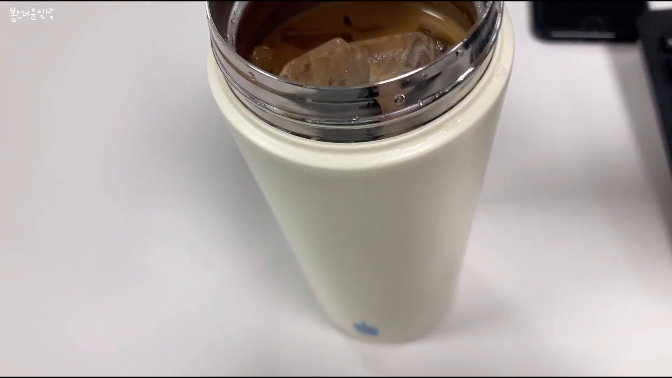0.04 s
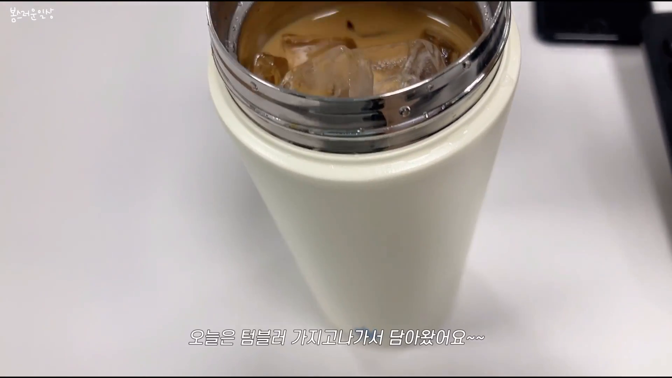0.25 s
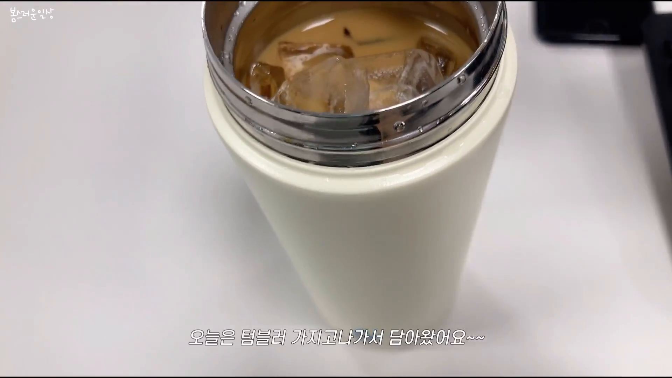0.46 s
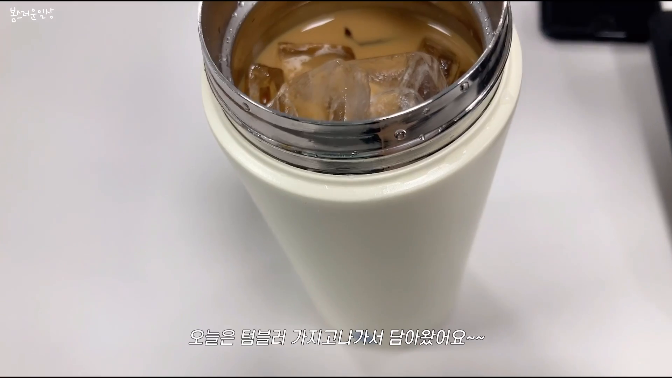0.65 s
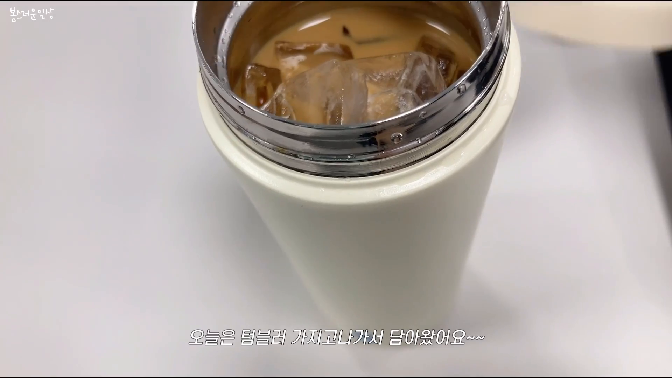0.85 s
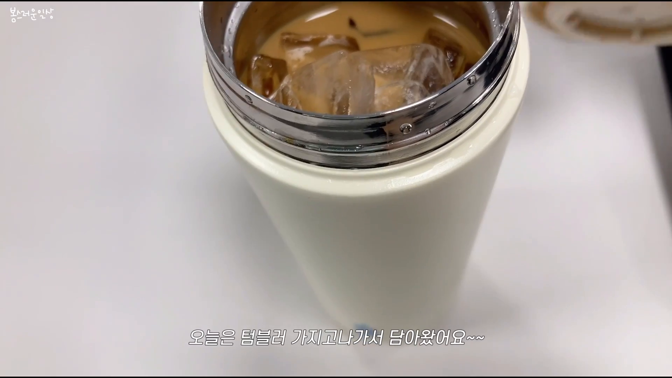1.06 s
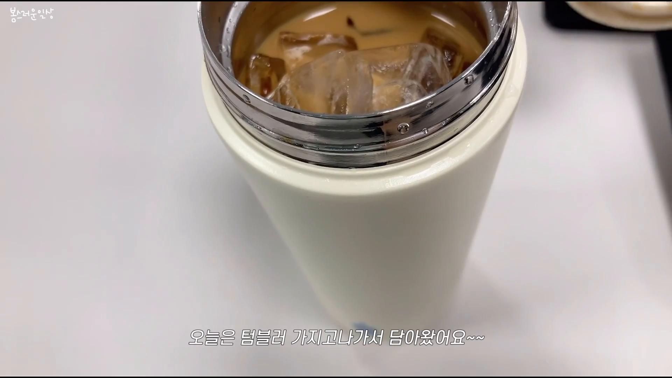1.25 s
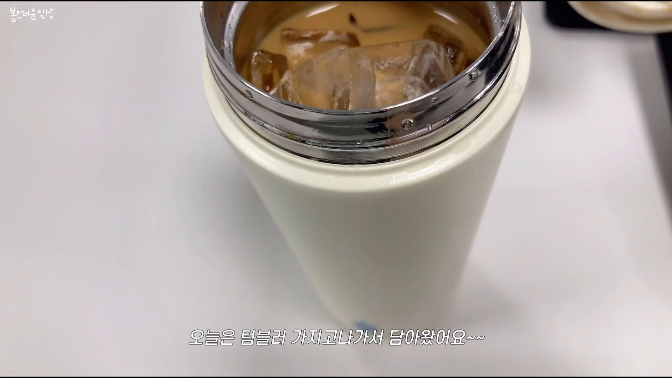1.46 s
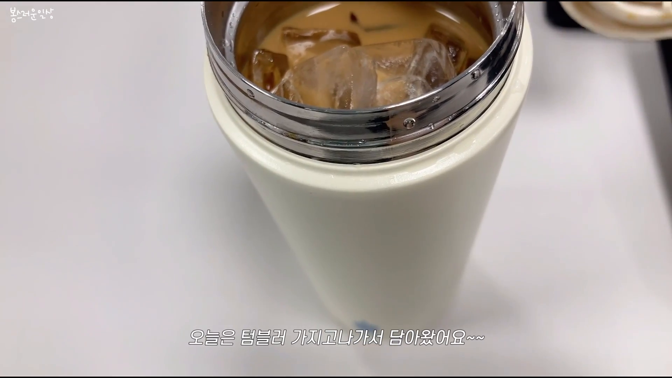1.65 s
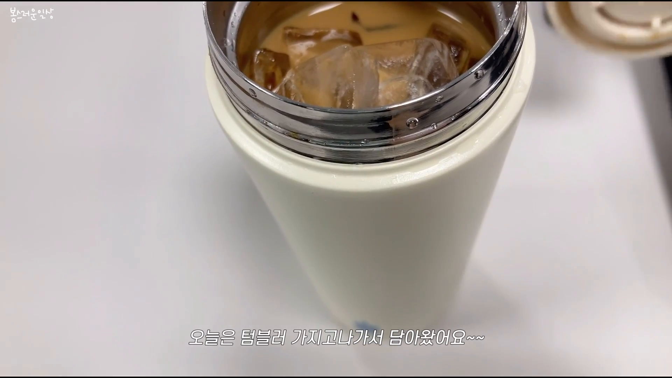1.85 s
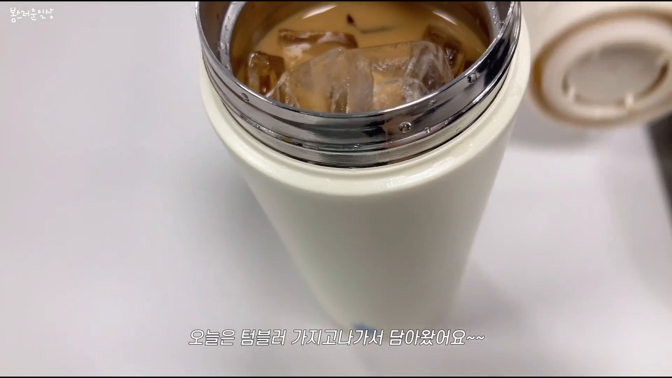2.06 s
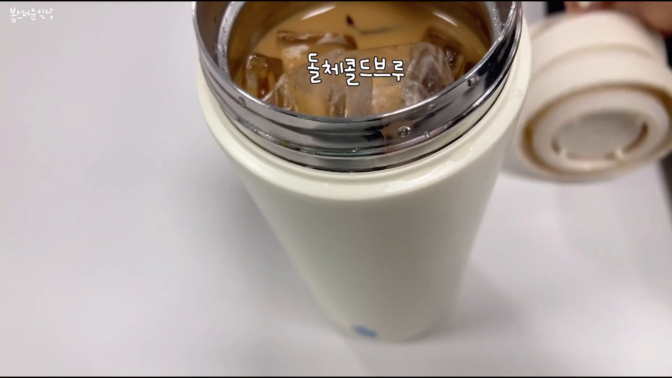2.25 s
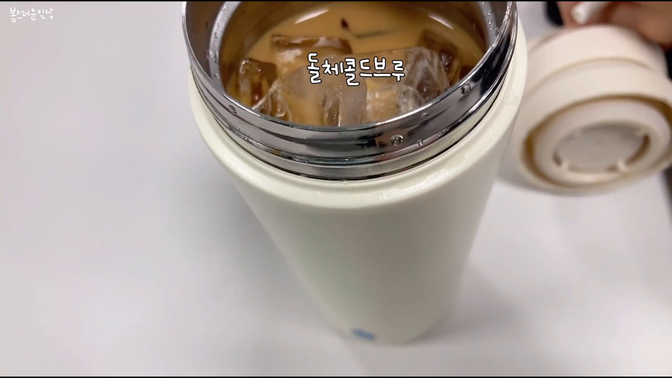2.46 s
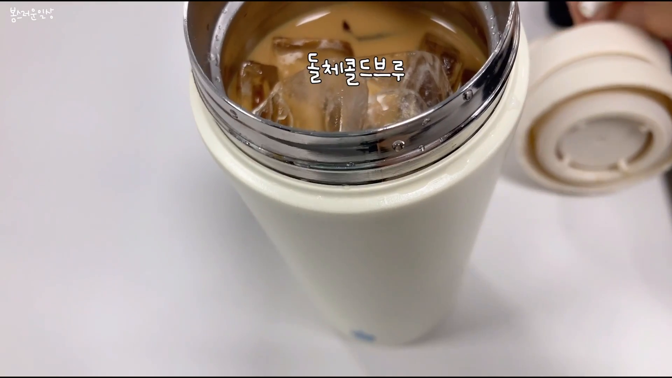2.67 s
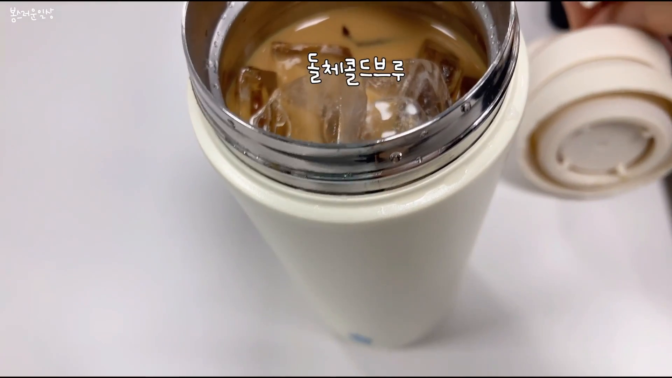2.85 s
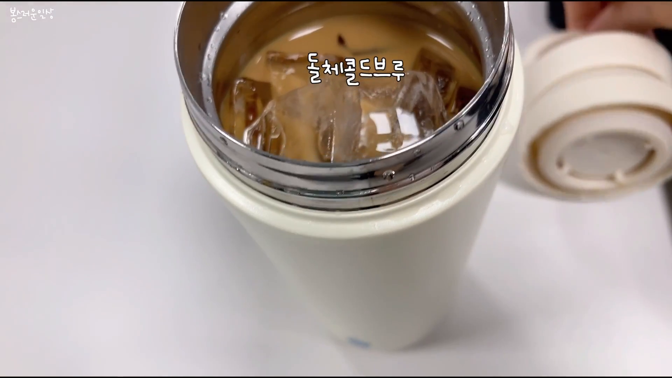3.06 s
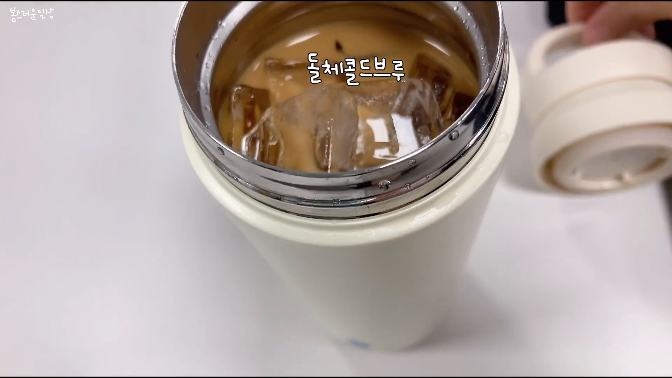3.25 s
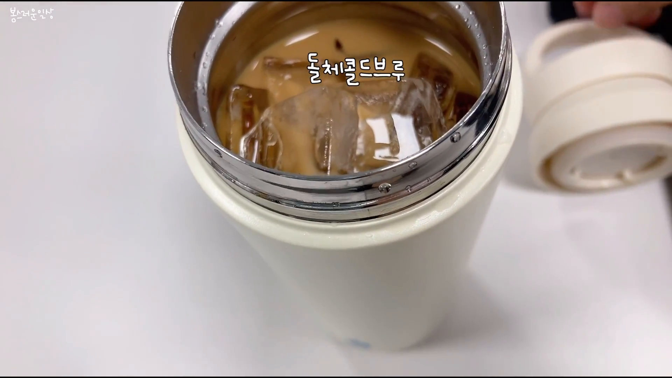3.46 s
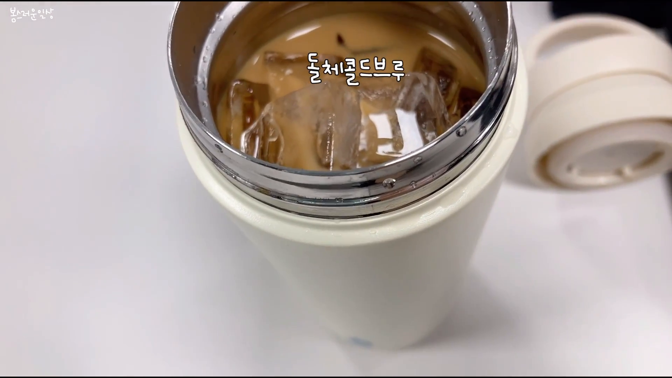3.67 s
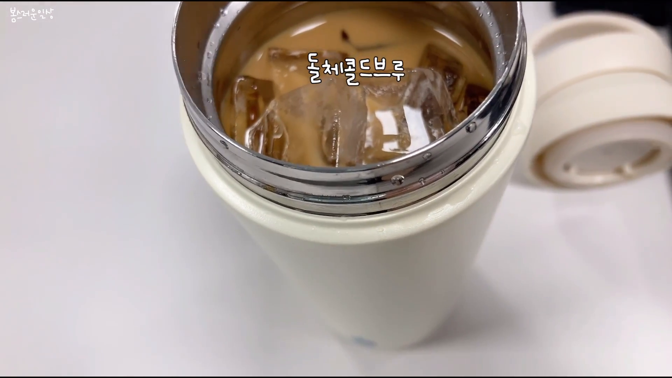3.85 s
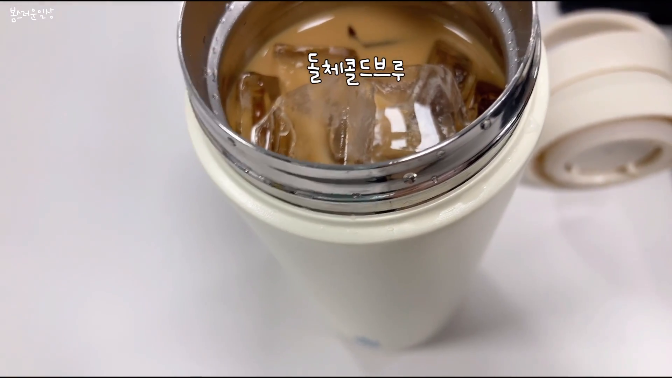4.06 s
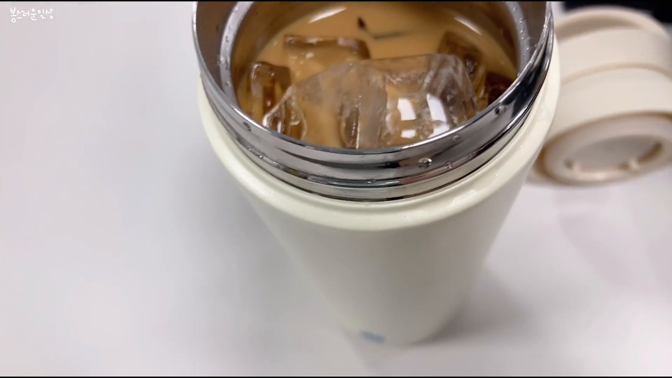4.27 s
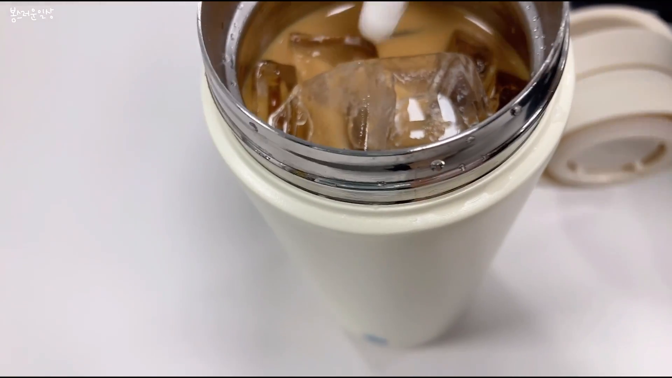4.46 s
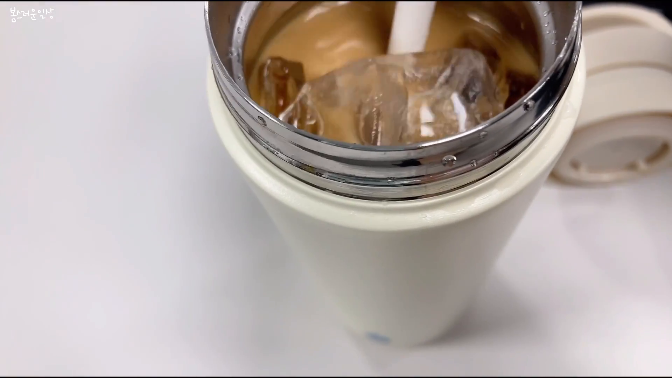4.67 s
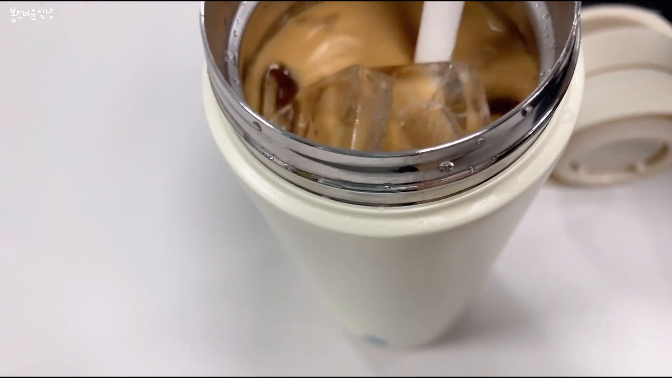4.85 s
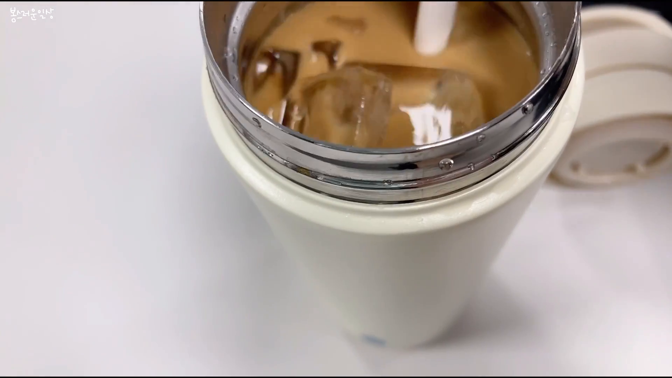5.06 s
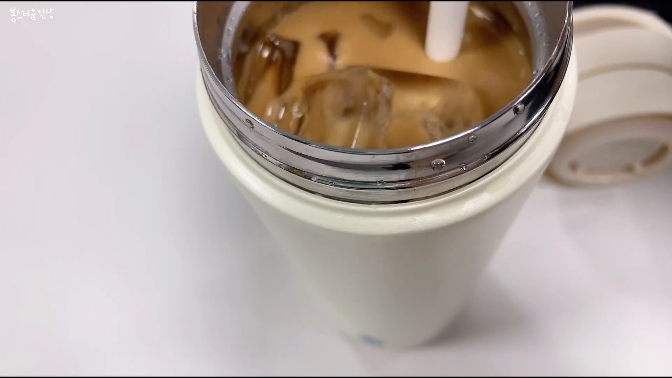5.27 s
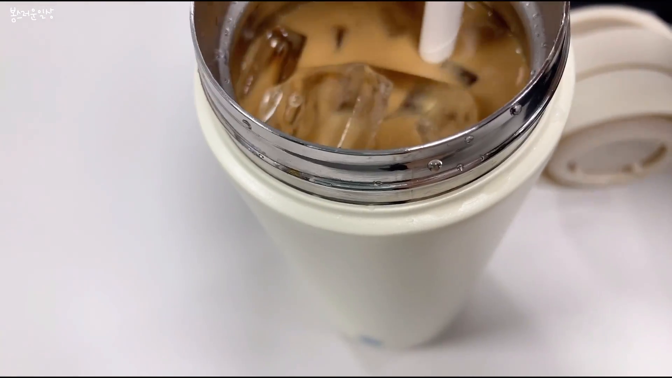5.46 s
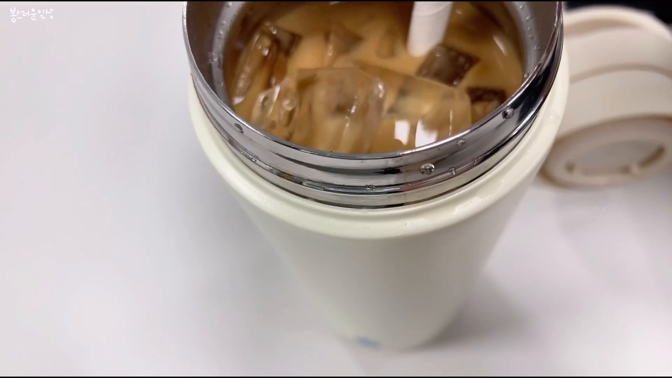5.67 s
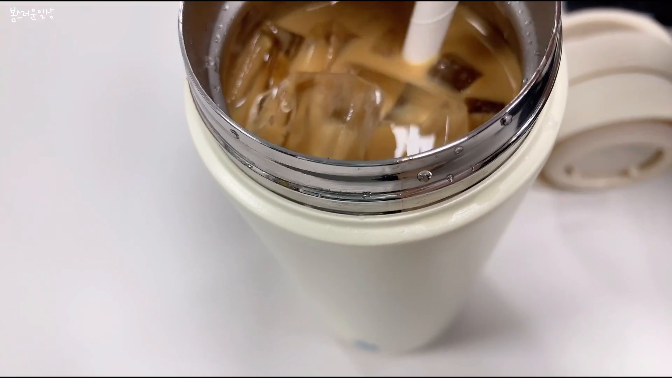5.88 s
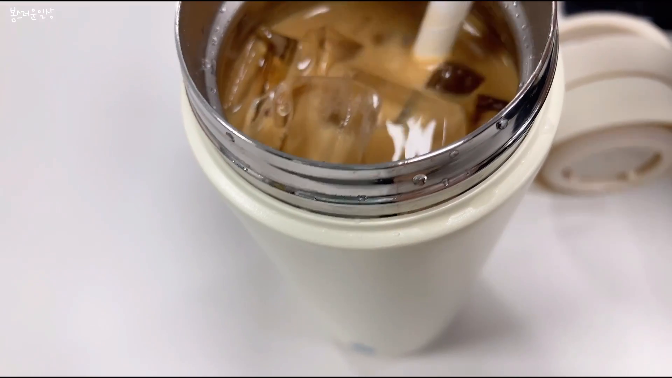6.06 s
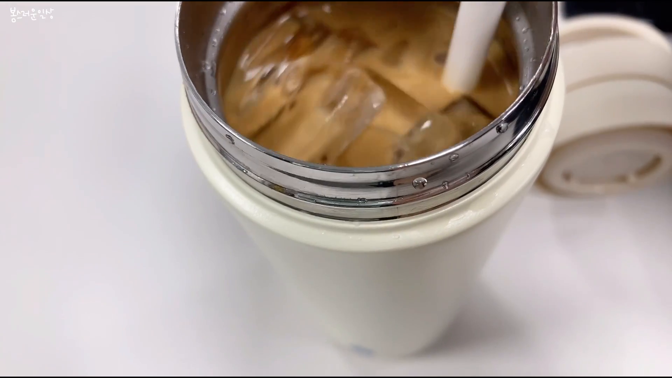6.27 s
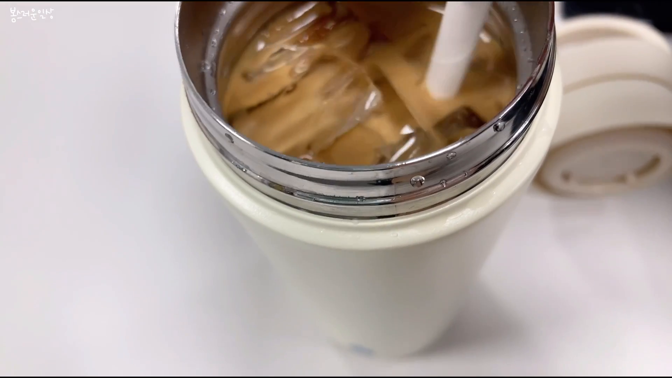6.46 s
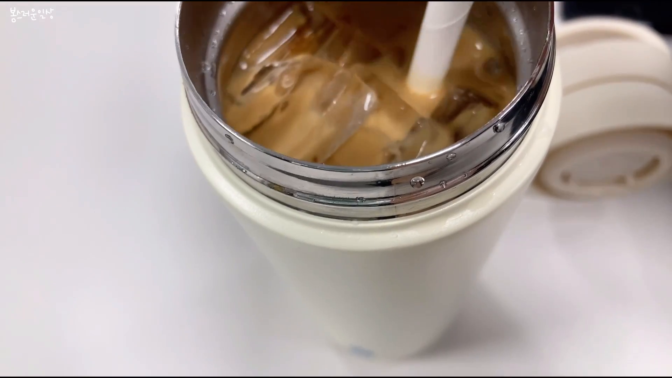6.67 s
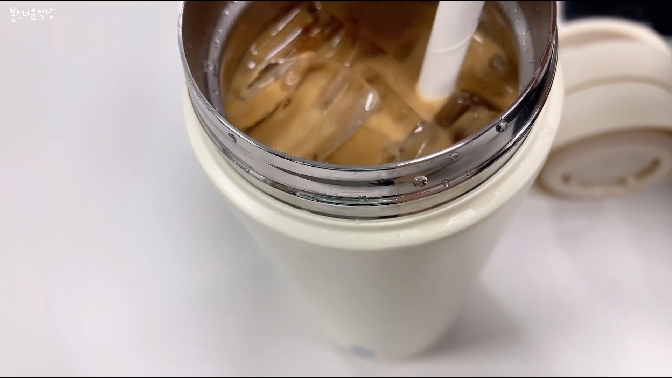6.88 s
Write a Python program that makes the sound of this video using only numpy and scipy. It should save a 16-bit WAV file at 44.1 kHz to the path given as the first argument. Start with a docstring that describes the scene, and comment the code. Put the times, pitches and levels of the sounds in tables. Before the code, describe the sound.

Faint ice ticks and a plastic lid knocking on a desk, then a straw stirs ice cubes clinking brightly in a steel tumbler of coffee.

```python
"""A straw stirs iced coffee in a steel tumbler: cubes grind and clink, coffee sloshes, bubbles plop.
Ice sounds are tiny blows ringing the steel wall; slosh is filtered splashes; bubbles and a few dull low
thuds are gliding tones. Before that the ice ticks faintly (short filtered noise), and the plastic lid
clicks and is set down on an office desk with two dull knocks (noise bursts, and a ringing desk top).
Ventilation rumble, a wavering hum and a soft hiss (shaped noise and a tone) run underneath."""
import sys
import numpy as np
from scipy import signal
from scipy.fft import rfft, irfft, next_fast_len
from scipy.io import wavfile

SR = 44100
rng = np.random.default_rng(int(sys.argv[2]) if len(sys.argv) > 2 else 0)


def generate_wav(sig):
    """Save sig (samples, or channels by samples) to the path in sys.argv[1] as 16-bit PCM at SR."""
    pcm = np.round(np.clip(np.atleast_2d(sig).T, -1, 1) * 32767).astype(np.int16)
    wavfile.write(sys.argv[1], SR, pcm)


N = 305172  # length in samples
STRAW_IN_S = 4.553  # when the straw goes in


def amp(db):
    """Turn decibels into gain."""
    return 10 ** (np.asarray(db) / 20)


def unit(x):
    """Scale to an rms (average strength) of 1."""
    return x / np.sqrt(np.mean(x ** 2) + 1e-20)


def along(points, hz):
    """Read a curve of (f/Hz, value) points on a log frequency axis."""
    f, value = np.transpose(points)
    return np.interp(np.log(hz + 1), np.log(f + 1), value)


def filtered(x, response):
    """Pass x through a response, given as a function of frequency."""
    size = next_fast_len(len(x) + SR // 4)
    spectrum = rfft(x, size) * response(np.fft.rfftfreq(size, 1 / SR))
    return irfft(spectrum, size)[:len(x)]


def causal(gain):
    """The minimum-phase response with this gain: nothing sounds before the blow."""
    cepstrum = irfft(np.log(np.maximum(gain, 1e-6)))
    half = len(cepstrum) // 2
    cepstrum[1:half] *= 2
    cepstrum[half + 1:] = 0
    return np.exp(rfft(cepstrum))


def resonances(modes, hz):
    """Gain of a set of (f/Hz, width/Hz, level/dB) resonances; their powers add."""
    power = 0
    for centre, width, db in modes:
        peak = hz * width / (centre ** 2 - hz ** 2 + 1j * hz * width)
        power = power + np.abs(amp(db) * peak) ** 2
    return np.sqrt(power)


def noise(spectrum):
    """Noise of rms 1, coloured by (f/Hz, level/dB) points."""
    return unit(filtered(rng.standard_normal(N), lambda hz: amp(along(spectrum, hz))))


def fade(t60, attack):
    """A quarter second of time, and an envelope that rises and then drops 60 dB every t60 seconds."""
    t = np.arange(SR // 4) / SR
    return t, 1000 ** (-t / max(t60, 1e-3)) * (1 - np.exp(-t / attack))


def add(track, s, db, sound):
    """Place a sound at time s with its peak at db."""
    room_left = track[round(s * SR):][:len(sound)]
    room_left += amp(db) * sound[:len(room_left)] / np.abs(sound).max()


def gesture(start, length, attack_s, release_db_per_s):
    """Gain of one movement: it builds up, holds until its length is over and dies away."""
    t = np.arange(N) / SR - start
    return np.clip(t / attack_s, 0, 1) * amp(-release_db_per_s * np.maximum(t - length, 0))


def gestures(rows, attack_s, release_db_per_s):
    """Joint gain of (t/s, length/s, level/dB) movements; their powers add."""
    power = sum((amp(db) * gesture(s, length, attack_s, release_db_per_s)) ** 2 for s, length, db in rows)
    return np.sqrt(power)


# tone colour of the ventilation: (f/Hz, relative level/dB)
VENT_COLOUR = [(12, -55), (25, -11), (42, -11), (54, 3), (64, -2), (78, -8.5), (95, -15), (128, -8),
               (160, -11), (190, -17), (260, -18), (430, -28.5), (600, -36.5), (1200, -42), (4500, -48),
               (9000, -54), (16000, -64)]
# swells of soft high rustle over the steady hiss: (t/s, length/s, level/dB)
RUSTLES = [(0, 1.03, -66), (1.88, 0.29, -62.5), (2.9, 0.21, -67), (3.5, 0.29, -61.5), (3.78, 0.37, -58)]
RUSTLE_ATTACK_S, RUSTLE_RELEASE_DB_PER_S, HISS_DB = 0.1, 45, -70.5


def background(vent_db=-44, hum_db=-52.5, waver_db=0.5, wander_hz=2.58):
    """Ventilation rumble with a fan's wavering low hum, under a soft hiss."""
    # two slow random curves of rms 1, for the hum's level and pitch
    slow = lambda hz: np.exp(-(hz / 5) ** 2)
    waver, wander = [unit(filtered(rng.standard_normal(N), slow)) for _ in range(2)]
    hum_hz = 54 + wander_hz * wander
    hum = unit(amp(waver_db * waver) * np.sin(2 * np.pi * np.cumsum(hum_hz) / SR))
    hiss = noise([(500, 1), (2000, -4), (5000, -4), (9000, -8), (14500, -4.5), (16000, -8.5)])
    rustle = gestures(RUSTLES, RUSTLE_ATTACK_S, RUSTLE_RELEASE_DB_PER_S)
    hiss_gain = np.hypot(amp(HISS_DB), rustle)
    return amp(vent_db) * noise(VENT_COLOUR) + amp(hum_db) * hum + hiss_gain * hiss


# clearer ticks of melting ice and of the handled lid: (t/s, peak level/dB, f/Hz, t60/s)
TICKS = [(0.084, -46.5, 2380, 0.043), (0.3053, -41.5, 6100, 0.15), (0.78, -38.5, 5060, .03),
         (1.1242, -43, 5500, 0.071), (2.081, -47, 2000, .03), (2.15, -46, 2830, 0.033),
         (2.734, -49, 3930, .04), (2.9407, -47, 3930, 0.098), (3.032, -46, 8560, 0.094),
         (3.947, -44, 5370, .034), (4.223, -42.5, 5050, 0.03)]
# tone colour of the bare crack of ice on ice, also used by the stirred cubes: (f/Hz, level/dB)
CRACK_COLOUR = [(60, -47), (200, -12.5), (450, -14), (650, -46), (1500, -14.5), (2500, -17), (3500, -12.5),
                (5600, -18), (8000, -20.5), (10500, -23.5), (14500, -18), (16000, -32)]
# the rest come by chance, at this peak level or up to the spread below it
FAINT_TICK_DB, FAINT_TICK_SPREAD_DB = -51, 6
FAINT_TICK_HZ, FAINT_TICK_T60_S = 4200, 0.048  # middle pitch; each may lie up to an octave away


def ticks(width_hz=900, crack_db=11, count=14):
    """Faint cracks: noise bursts with one broad resonance each; the faintest fall at random."""
    track = np.zeros(N)
    faint = []
    for when, size, pitch in rng.random((count, 3)):
        db = FAINT_TICK_DB - FAINT_TICK_SPREAD_DB * size
        faint.append((when * STRAW_IN_S, db, FAINT_TICK_HZ * 2 ** (2 * pitch - 1), FAINT_TICK_T60_S))
    for s, db, pitch_hz, t60 in TICKS + faint:
        t, envelope = fade(t60, attack=0.001)
        colour = lambda hz: causal(resonances([(pitch_hz, width_hz, 0)], hz)
                                   + amp(along(CRACK_COLOUR, hz) + crack_db))
        add(track, s, db, filtered(envelope * rng.standard_normal(len(t)), colour))
    return track


# how long the room rings: (f/Hz, t60/s)
ROOM_DECAY = [(150, 0.5), (1500, 0.061), (5000, 0.16), (15000, 0.29)]


def office(x):
    """The room's answer: a noise tail that fades at a different speed for each pitch."""
    hz, t, z = signal.stft(rng.standard_normal(SR // 2), SR, nperseg=256)
    fading = z * 1000 ** (-t / along(ROOM_DECAY, hz)[:, None])
    tail = signal.istft(fading, SR, nperseg=256)[1]
    tail = np.pad(tail / np.linalg.norm(tail), (SR // 200, 0))  # starts 5 ms late
    return signal.fftconvolve(x, tail)[:N]


# a hand brushing the lid: (t/s, length/s, level/dB)
BRUSHES = [(1.185, 0.035, -55.5)]
# tone colour of the brushing: (f/Hz, relative level/dB)
SKIN_COLOUR = [(300, -22), (750, 0), (1400, -3.5), (2500, -11.5), (8000, -23)]
BRUSH_ATTACK_S, BRUSH_RELEASE_DB_PER_S = 0.016, 130
# low rubbing: things dragging on the desk, then the low body of the first stir through the ice:
# (t/s, length/s, level/dB)
LOW_RUBS = [(2.82, 0.039, -52.5), (3.085, 0.15, -47.5), (3.215, 0.038, -34), (4.555, 0.069, -40),
            (4.63, .17, -51.5), (4.79, .14, -40.5)]
# tone colour of the low rubbing: (f/Hz, relative level/dB)
RUB_COLOUR = [(100, -20), (200, -4.5), (340, 1), (430, 8), (530, -9.5), (700, -15), (1000, -25),
              (1500, -27), (5000, -67)]
RUB_ATTACK_S, RUB_RELEASE_DB_PER_S = 0.028, 302


def rubbing():
    """Swelling noise: a hand brushes the lid, things drag on the desk, then the first stir's low body."""
    brush = gestures(BRUSHES, BRUSH_ATTACK_S, BRUSH_RELEASE_DB_PER_S) * noise(SKIN_COLOUR)
    low_rub = gestures(LOW_RUBS, RUB_ATTACK_S, RUB_RELEASE_DB_PER_S) * noise(RUB_COLOUR)
    return brush + low_rub


# the lid's hard rim clicks: (t/s, peak level/dB, brightness/dB per octave, t60/s)
SNAPS = [(1.565, -42, -8, 0.037), (1.568, -23, -2, 0.046), (1.578, -34.5, -3, 0.29),
         (2.3757, -41, -7.5, 0.027), (3.2415, -37.5, -6, 0.023), (3.258, -41.5, -4, 0.027)]
# tone colour of the plastic, before each click's brightness: (f/Hz, relative level/dB)
PLASTIC_COLOUR = [(300, -23), (800, -24), (1250, -1.5), (1700, -4.5), (2300, -1.5), (4300, -5.5),
                  (5600, -2.5), (8000, -9), (15000, -14)]
# the lid meets the desk: (t/s, peak level/dB)
KNOCKS = [(2.3778, -20), (2.384, -25), (3.2459, -21.5), (3.262, -24.5), (3.2817, -28)]
# resonances of the desk top: (f/Hz, width/Hz, relative level/dB)
DESK_MODES = [(267, 37, 0.5), (320, 78, 2.5), (365, 42, 1.5), (438, 68, 0.5), (510, 35, -7), (710, 99, -12),
              (900, 35, -20), (1270, 100, -13), (1680, 69, -21)]


def lid(softness_s=0.0011):
    """The plastic lid clicks sharply; its soft landing sets the desk top ringing."""
    track = np.zeros(N)
    for s, db, brightness, t60 in SNAPS:
        t, envelope = fade(t60, attack=0.00052)
        tilt_db = lambda hz: brightness * np.log2(np.maximum(hz, 500) / 2000)
        plastic = lambda hz: causal(amp(along(PLASTIC_COLOUR, hz) + tilt_db(hz)))
        add(track, s, db, filtered(envelope * rng.standard_normal(len(t)), plastic))
    t = np.arange(SR // 4) / SR
    ring = np.zeros(len(t))
    for hz, width, db in DESK_MODES:
        # the wider a resonance, the faster it dies
        ring += amp(db) * np.exp(-np.pi * width * t) * np.sin(2 * np.pi * hz * t)
    for s, db in KNOCKS:
        add(track, s, db, ring * (1 - np.exp(-t / softness_s)))
    return track


# resonances of the filled steel tumbler, before random changes: (f/Hz, width/Hz, level/dB)
TUMBLER_MODES = [(885, 120, -7), (1249, 34, -7), (1712, 46, -9), (2033, 22, 3), (3084, 32, 2),
                 (3226, 50, -9), (3400, 150, -13), (4095, 32, -8), (4331, 45, -5), (4590, 34, -2),
                 (5040, 140, -13), (6180, 120, -17), (6638, 40, -9), (6730, 50, -11), (7095, 18, -7),
                 (7340, 80, -9), (7870, 56, -12), (8340, 150, -14), (8960, 90, -11), (9700, 90, -10),
                 (12100, 100, -20), (13700, 85, -20)]


def tumbler(hz, direct_db=0, spot_db=3.0, cube_db=-10, cube_width_hz=180):
    """Ice heard through the steel wall and directly; every spot and every cube rings a little differently."""
    wall = [(centre, width, db + spot_db * rng.standard_normal()) for centre, width, db in TUMBLER_MODES]
    cube = [(centre, cube_width_hz, cube_db) for centre in 1400 * 2 ** (5.8 * rng.random(size=3))]
    direct = np.hypot(resonances(cube, hz), amp(along(CRACK_COLOUR, hz)))
    return np.hypot(resonances(wall, hz), amp(direct_db) * direct)


def grains(rate, spread_db):
    """Random tiny impacts of uneven size, about rate of them a second."""
    sizes = amp(spread_db * np.clip(rng.standard_normal(N), -2, 2)) * rng.choice([-1, 1], N)
    return sizes * (rng.random(N) < rate / SR)


def grinding(rate, catch_db, direct_db, count=12):
    """Several cubes slip in tiny jerks, each catching and letting go in its own time."""
    hz = np.fft.rfftfreq(2 * (SR // 8), 1 / SR)
    track = np.zeros(N)
    for cube in range(count):
        # pressure wanders between random values 600 samples apart
        knots = np.clip(rng.standard_normal(N // 600), -1.5, 1.5)
        pressure = amp(catch_db * np.interp(np.arange(N), np.linspace(0, N, len(knots)), knots))
        slips = pressure * grains(rate, spread_db=2.0)
        ring = irfft(causal(tumbler(hz, direct_db)))
        track += signal.oaconvolve(slips, ring)[:N]
    return unit(track)


def froth(count=700, centre_hz=950, spread_octaves=0.602, life_cycles=24, rise=0.29):
    """A crowd of small bubbles: each lives a set number of cycles and rises in pitch."""
    track = np.zeros(N)
    t = np.arange(SR // 16) / SR
    for start, octave, size in zip(rng.random(count), *rng.standard_normal((2, count))):
        hz = centre_hz * 2 ** (spread_octaves * np.clip(octave, -2, 2))
        age = np.minimum(t * hz / life_cycles, 2)
        envelope = 1000 ** -age * (1 - np.exp(-t * hz))
        ring = envelope * np.sin(2 * np.pi * hz * t * (1 + rise * age / 2))
        add(track, start * (N - 1) / SR, 3 * size, ring)
    return unit(track)


# pushes of the straw through the ice, levels before the mix gains in stirring():
# (t/s, length/s, grinding ice level/dB, sloshing level/dB, dry-edge level over the ice/dB)
PUSHES = [(4.563, 0.046, -39.5, -41.5, 4.5), (4.792, 0.066, -37, -46, 1), (4.88, 0.057, -38.5, -42, 3),
          (4.946, .3, -48, -47.5, 6.5), (5.089, 0.052, -37, -38, 1), (5.253, .06, -37, -39.5, -2),
          (5.306, 0.086, -33.5, -34.5, 0.5), (5.412, 0.24, -51, -55, -2), (5.546, 0.085, -38.5, -35.5, 5.5),
          (5.881, 0.25, -49.5, -49, 1.5), (6.093, .18, -44, -50, -3), (6.28, 0.15, -34.5, -45, -4),
          (6.352, 0.032, -38.5, -38, -1), (6.446, 0.059, -31.5, -49, -0.5),
          (6.517, 0.095, -40.5, -52, -5.5), (6.769, .11, -50, -53, -0.5)]
# tone colour of moving coffee: (f/Hz, relative level/dB)
SLOSH_COLOUR = [(20, -25), (50, -9), (120, 0), (300, 0), (450, 0.5), (620, -13.5), (880, -1), (1100, -6),
                (1500, -10.5), (2500, -17.5), (6000, -31)]
PUSH_ATTACK_S, ICE_SETTLE_DB_PER_S, COFFEE_SETTLE_DB_PER_S = 0.02, 254, 195
# between pushes the drink keeps turning: ice, coffee, and dry edges over the ice, before the mix gains
DRIFT_DB, SWIRL_DB, DRIFT_HARDNESS_DB = -66, -60, 10


def stirring(dry_db=-4, sunk_db=-4, slosh_db=-4, froth_db=-9, muffle_hz=4500, edge_hz=14000):
    """Dry cube edges crackle, sunken cubes mostly ring the wall, and the coffee splashes around them."""
    s, length, ice_db, coffee_db, hardness_db = np.transpose(PUSHES)
    straw_in = np.arange(N) / SR > STRAW_IN_S

    def motion(push_db, settle, rest_db):
        """Gain of the pushes over the steady turning."""
        return np.hypot(gestures(zip(s, length, push_db), PUSH_ATTACK_S, settle), amp(rest_db))

    dry_ice = grinding(rate=120, catch_db=2.5, direct_db=0.0)
    dry_ice = unit(filtered(dry_ice, lambda hz: 1 / (1 + (hz / edge_hz) ** 4)))
    sunk_ice = grinding(rate=230, catch_db=3.0, direct_db=-16.0)
    sunk_ice = unit(filtered(sunk_ice, lambda hz: 1 / (1 + (hz / muffle_hz) ** 4)))
    edge_motion = motion(ice_db + hardness_db, ICE_SETTLE_DB_PER_S, DRIFT_DB + DRIFT_HARDNESS_DB)
    edges = amp(dry_db) * dry_ice * edge_motion
    cubes = amp(sunk_db) * sunk_ice * motion(ice_db, ICE_SETTLE_DB_PER_S, DRIFT_DB)
    splashes = grains(rate=650, spread_db=3)
    slosh = unit(filtered(splashes, lambda hz: causal(amp(along(SLOSH_COLOUR, hz)))))
    liquid = amp(slosh_db) * slosh + amp(froth_db) * froth()
    coffee = liquid * motion(coffee_db, COFFEE_SETTLE_DB_PER_S, SWIRL_DB)
    return straw_in * (edges + cubes + coffee)


# cubes striking each other and the wall:
# (t/s, peak level/dB, ring f/Hz, ring level over the blow's peak/dB, brightness/dB per octave)
CLINKS = [(4.5744, -28.5, 1930, -8, 4), (4.585, -21.5, 3280, -13, 0.5), (4.6275, -27, 2080, -0.5, 2.5),
          (4.7577, -40.5, 2065, -3.5, 7), (4.811, -27.5, 3240, -3, -1.5), (4.829, -22, 3440, -9, -1),
          (4.8993, -20.5, 6680, -8, 0.5), (4.9157, -11.5, 9620, -15, 1.5), (4.9414, -21.5, 4540, -11, 2),
          (4.9975, -30.5, 2100, -5, 1.5), (5.038, -30, 2940, -16, -3.5), (5.094, -22.5, 6800, -7, 5.5),
          (5.114, -23, 2050, -2, 2), (5.131, -29, 2040, 7, -2), (5.1693, -27, 3240, -13, -5),
          (5.2815, -26.5, 3130, -7, -2), (5.3113, -17.5, 3560, -6, -1.5), (5.3455, -15, 8280, -8.5, -0.5),
          (5.362, -21, 2017, 5, 2), (5.3815, -18, 1794, -6.5, -1.5), (5.56, -22.5, 3240, -10, -2.5),
          (5.591, -19, 2023, -12, 4), (5.625, -26.5, 2034, -9, 1), (5.7205, -33.5, 3050, -15, -0.5),
          (5.8914, -41.5, 4560, -7, 3), (5.935, -36, 4560, -12, -1.5), (5.9146, -37, 1940, -9, -6),
          (5.9948, -30, 1263, -3, -1.5), (6.0937, -22.5, 3120, -7.5, 0.5), (6.1382, -27.5, 6620, -8, 0),
          (6.1875, -16, 6735, -12, 3), (6.2633, -20, 3130, -11, -1.5), (6.3181, -27, 4320, 0, 1),
          (6.359, -30, 3060, -1, -16), (6.4487, -10.5, 1680, -11, -0.5), (6.48, -30, 3130, -4, 1),
          (6.492, -18, 4300, -3, -2.5), (6.4958, -21, 4603, 19, 4), (6.524, -24, 4350, -4, 0.5),
          (6.575, -26.5, 4580, 5, -2), (6.6584, -38, 4620, -4, 0), (6.7048, -30, 3187, -5, -1),
          (6.7756, -35, 4300, -2, -0.5), (6.791, -30, 4500, 0.5, 0), (6.821, -34, 1270, 0, -2),
          (6.8659, -34.5, 2080, -6, -2), (6.8938, -37, 6600, -10, 8)]
# chatter of a blow at the firm level; it halves for every so many dB harder
CHATTER_T60_S, FIRM_DB, CHATTER_HALVES_DB = 0.046, -21.5, 27


def clinks(ring_t60=0.062):
    """Each blow is a brief chatter of contacts that rings the wall, plus one added note."""
    track = np.zeros(N)
    hz = np.fft.rfftfreq(2 * (SR // 4), 1 / SR)
    for s, db, pitch_hz, ring_db, brightness in CLINKS:
        chatter_t60 = CHATTER_T60_S * 2 ** ((FIRM_DB - db) / CHATTER_HALVES_DB)
        t, envelope = fade(chatter_t60, attack=0.00088)
        hardness = amp(brightness * np.log2(np.maximum(hz, 500) / 4000))
        chatter = rfft(envelope * rng.standard_normal(len(t)), 2 * len(t))
        blow = irfft(chatter * causal(tumbler(hz) * hardness))[:len(t)]
        note = fade(ring_t60, attack=0.00033)[1] * np.sin(2 * np.pi * pitch_hz * t)
        add(track, s, db, blow / np.abs(blow).max() + amp(ring_db) * note)
    return track


# bubbles between the cubes, and a few dull low thuds in the drink:
# (t/s, peak level/dB, starting f/Hz, glide/octaves per s, t60/s)
BUBBLES_AND_THUDS = [(4.962, -36, 916, 2.5, .08), (5.038, -36.5, 815, 4.5, .041),
                     (5.198, -40.5, 1273, 23, .11), (5.2545, -30.5, 1020, 15, 0.013),
                     (5.41, -23.5, 790, 9, 0.023), (5.562, -29.5, 860, -6, 0.036),
                     (5.584, -29.5, 144, 0.5, 0.079), (6.108, -28.5, 285, 4, .027),
                     (6.11, -32, 126, 5, .11), (6.357, -38.5, 2340, 6, .06), (6.371, -33.5, 145, -5, 0.1),
                     (6.851, -40.5, 872, 0.5, 0.056)]
SWELL_SHARE = 0.068  # rise time as a share of t60


def bubbles_and_thuds():
    """Each bubble or thud rings while its pitch glides, by 0.8 octave at most."""
    track = np.zeros(N)
    for s, db, pitch_hz, glide, t60 in BUBBLES_AND_THUDS:
        t, envelope = fade(t60, SWELL_SHARE * t60)
        pitch = pitch_hz * 2 ** np.clip(glide * t, -0.8, 0.8)
        add(track, s, db, envelope * np.sin(2 * np.pi * np.cumsum(pitch) / SR))
    return track


def scene(drink_room_db=-14, lid_room_db=-8):
    """The drink is closest and driest; the lid lies further off, so it gets more room sound."""
    drink = clinks() + stirring() + bubbles_and_thuds()
    around = lid() + ticks() + rubbing()
    room = office(amp(drink_room_db) * drink + amp(lid_room_db) * around)
    return (drink + around + room + background())[None]


TOP_HZ = 15500


def record(dry):
    """A very steep low-pass removes the sound above the band limit."""
    return filtered(dry[0], lambda hz: 1 / (1 + (hz / TOP_HZ) ** 200))[None]


dry = scene()
out = record(dry)
generate_wav(out)
```